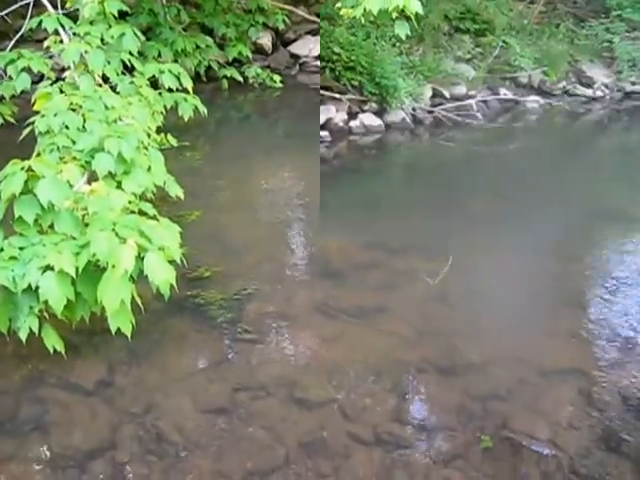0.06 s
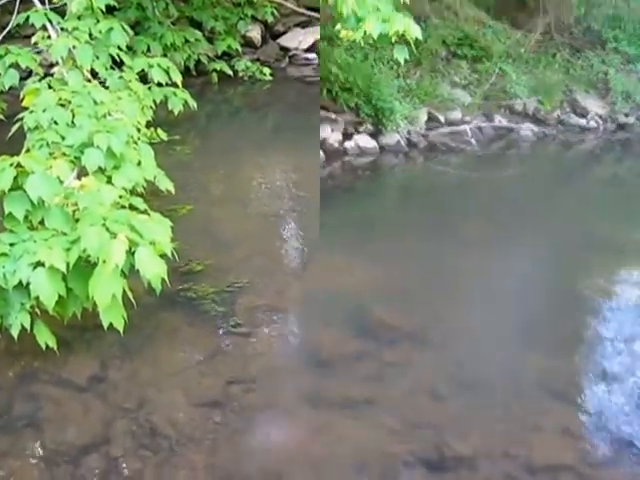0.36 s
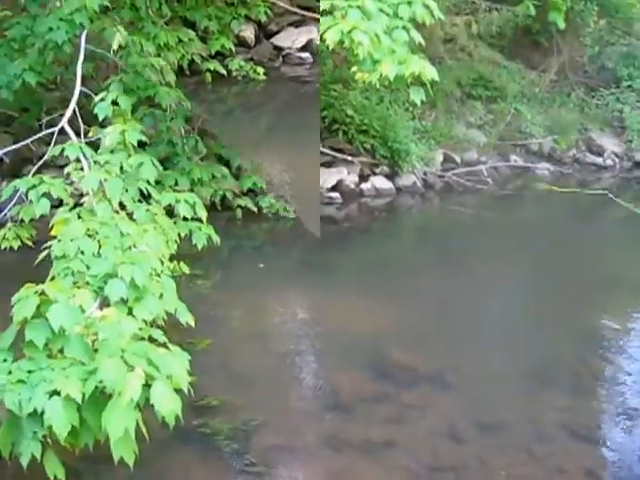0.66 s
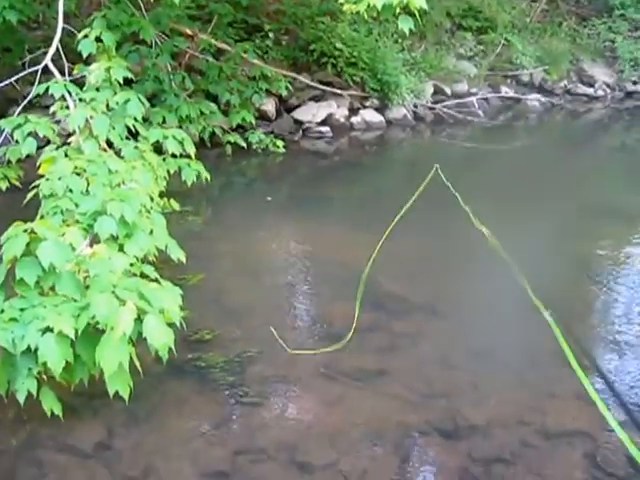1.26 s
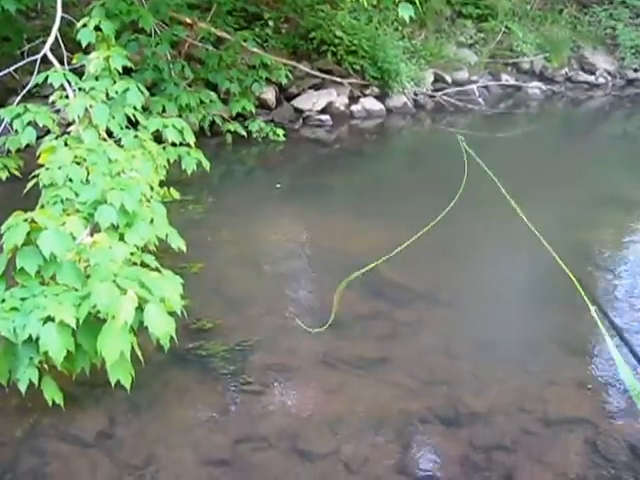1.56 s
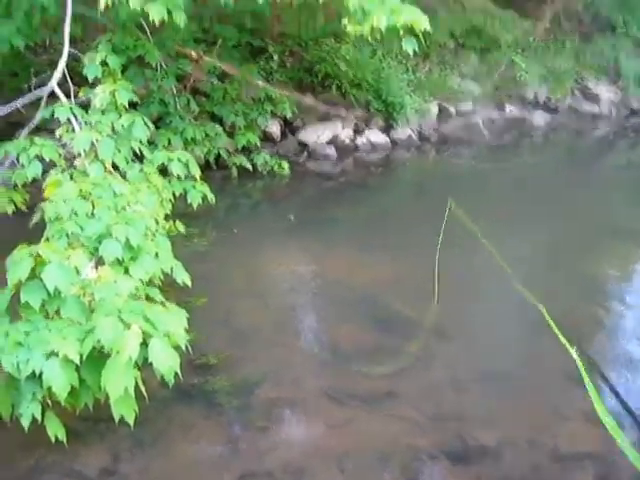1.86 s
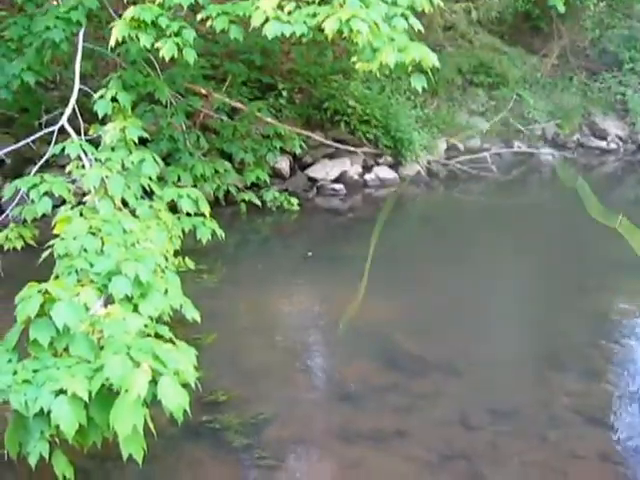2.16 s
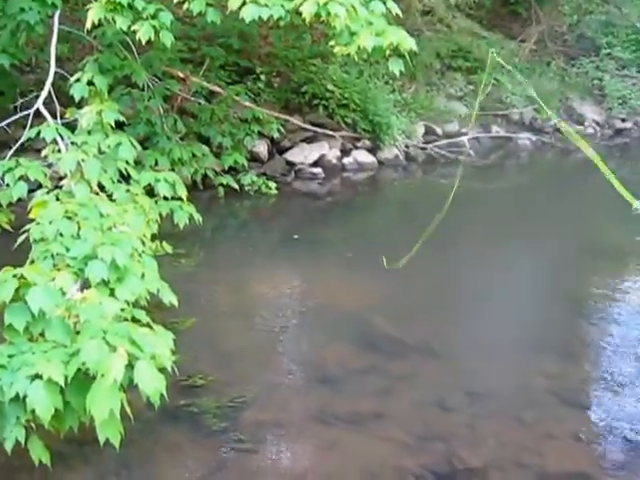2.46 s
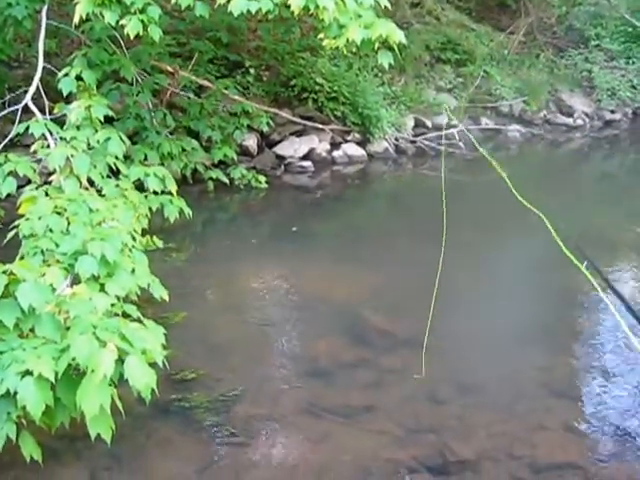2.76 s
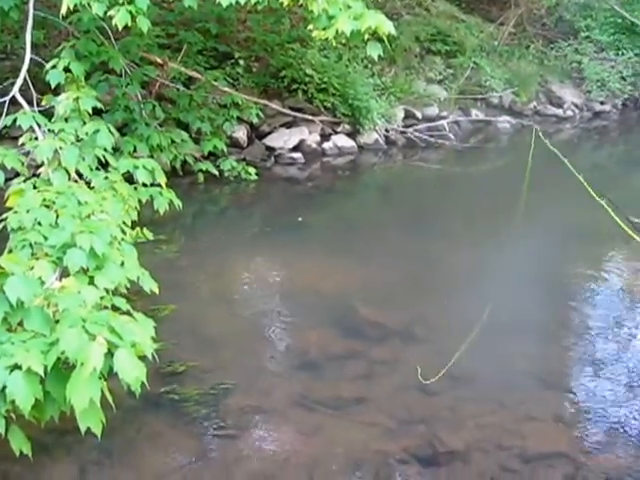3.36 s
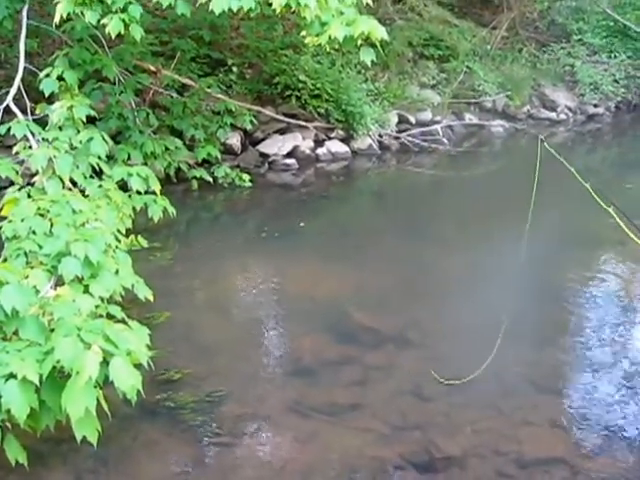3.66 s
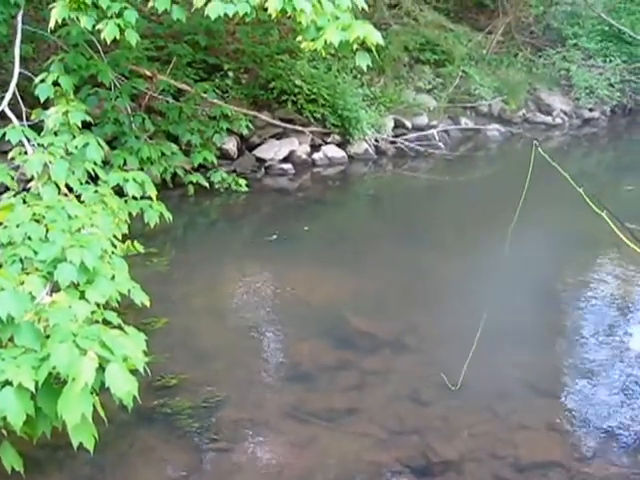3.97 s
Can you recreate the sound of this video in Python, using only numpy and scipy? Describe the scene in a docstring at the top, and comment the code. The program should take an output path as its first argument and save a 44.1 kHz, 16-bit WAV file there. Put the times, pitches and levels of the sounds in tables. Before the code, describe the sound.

A small creek rushes steadily in woodland, bubbling softly. Birds call from the trees with a row of falling notes, thin whistles and three sharp chips. In the second half, fishing tackle ticks lightly close to the microphone.

```python
"""A small creek in woodland, fading in. The water rushes as shaped noise and bubbles ring softly in it.
Birds whistle far off, one sings a row of falling slurs and another gives three sharp chips; each call
is a gliding near-sine, scattered by trunks and leaves. Close by, fishing tackle scrapes softly
and ticks, each tick a snap of noise and a short ring."""
import sys
import numpy as np
from scipy import signal
from scipy.fft import rfft, irfft
from scipy.io import wavfile
from scipy.ndimage import uniform_filter1d

SR = 44100
rng = np.random.default_rng(int(sys.argv[2]) if len(sys.argv) > 2 else 0)


def store_pcm(level_fs):
    """Save levels as 16-bit WAV."""
    pcm = np.round(np.clip(level_fs, -1, 1) * 32767).astype(np.int16)
    wavfile.write(sys.argv[1], SR, np.atleast_2d(pcm).T)


N = 176400


def undb(db):
    """Decibels to gain."""
    return 10 ** (np.asarray(db) / 20)


def unit(x):
    """Scale to rms 1."""
    return x / np.sqrt(np.mean(x ** 2))


def seconds(length_s):
    """Time axis of a short sound."""
    return np.arange(int(length_s * SR)) / SR


def decay(t, t60_s):
    """Envelope that falls 60 dB in t60_s."""
    return np.exp(-np.log(1000) * t / t60_s)


def add(out, start_s, sound):
    """Mix a sound in at a time."""
    i = int(np.clip(start_s * SR, 0, N - 1))
    out[i:i + len(sound)] += sound[:N - i]


def wander(rate_hz):
    """Smooth random drift at rms 1."""
    hold = int(SR / rate_hz)
    steps = np.repeat(rng.standard_normal(N // hold + 1), hold)
    return unit(uniform_filter1d(uniform_filter1d(steps, hold), hold)[:N])


def band_pass(x, low_hz, high_hz):
    """One band of a sound, at rms 1."""
    return unit(signal.sosfilt(signal.butter(2, [low_hz, high_hz], "band", fs=SR, output="sos"), x))


def wood_echo(x, t60_s, tail_t60_s=1.08, tail_db=-5, damp_hz=6040, build_s=.0091, grain=.5):
    """Echoes from trunks and leaves build up and fade: a bright grainy part and a duller tail."""
    t = seconds(1.7)
    scatter, clumps, wash = rng.standard_normal((3, N))[:, :len(t)]
    bright = unit(scatter * np.exp(grain * clumps)) * decay(t, t60_s)
    dull = signal.sosfilt(signal.butter(2, damp_hz, fs=SR, output="sos"), wash)
    tail = undb(tail_db) * dull * decay(t, tail_t60_s)
    echo = (bright + tail) * (1 - np.exp(-t / build_s))
    return signal.fftconvolve(x, echo / np.linalg.norm(echo))[:N]


def leaf_blur(x, decay_s, blur_db):
    """Nearby leaves smear a note over a few milliseconds."""
    t = seconds(.04)
    blur = rng.standard_normal(len(t)) * np.exp(-t / decay_s)
    paths = undb(blur_db) * blur / np.linalg.norm(blur)
    paths[0] += 1  # direct sound
    return signal.fftconvolve(x, paths / np.linalg.norm(paths))


# Spectrum of the rush. Each row: frequency in Hz, relative spectral density in dB.
RUSH_SPECTRUM = [(25, -8.5), (60, -2), (120, -1.5), (280, -4), (480, -2.13), (750, 2.14), (1280, 1),
                 (1650, -4), (2300, -5.5), (3200, -9), (4400, -12.5), (6000, -17.5), (9000, -21.5),
                 (12000, -22), (16000, -27)]


def creek(level_db=-46.5, flicker_db=.37, swell_db=-.03):
    """The rush of a riffle: shaped noise whose half-octave bands flicker a little."""
    bin_hz = np.maximum(np.arange(N // 2 + 1) * SR / N, 1)
    hz, db = np.array(RUSH_SPECTRUM).T
    spectrum = rfft(rng.standard_normal(N)) * undb(np.interp(np.log(bin_hz), np.log(hz), db))
    band = np.round(2 * np.log2(np.maximum(bin_hz, 100)))
    rush = sum(irfft(spectrum * (band == k), N) * undb(flicker_db * wander(18)) for k in np.unique(band))
    return unit(rush) * undb(level_db + swell_db * wander(2.01))


def bubble(hz, decay_cycles=8.9, rise=.119):
    """A bubble rings for some cycles while its pitch rises."""
    cycles = seconds(4 * decay_cycles / hz) * hz
    age = cycles / decay_cycles
    envelope = np.exp(-age) * (1 - np.exp(-cycles))
    return envelope * np.sin(2 * np.pi * cycles * (1 + rise * age / 2))


# Single plops. Each row: start in seconds, starting pitch in Hz, level in dB.
PLOPS = [(.762, 800, -38), (2.441, 1055, -43.5), (3.50, 1100, -39.5)]


def bubbles(per_s=120, fizz_db=-60.5, fizz_hz=1100, spread_octaves=.7):
    """Many tiny bubbles, the higher ones weaker, and a few clearer plops."""
    fizz, plops = np.zeros((2, N))
    for when, height, strength in rng.random((int(per_s * N / SR), 3)):
        hz = fizz_hz * 2 ** (spread_octaves * (3 * height ** 2 - 1))
        add(fizz, when * N / SR, bubble(hz) * strength ** 3 * undb(-7 * height))
    for start_s, hz, db in PLOPS:
        add(plops, start_s, undb(db) * bubble(hz))
    return unit(fizz) * undb(fizz_db) + plops


# Far whistles. Each row: start and length in seconds, first and last pitch in Hz, level in dB.
WHISTLES = [(0.29, .09, 3890, 4800, -60), (0.396, 0.044, 2498, 2733, -45), (0.441, 0.042, 2700, 2694, -52),
            (0.524, 0.029, 2870, 2980, -59), (0.568, 0.069, 2070, 2030, -51),
            (.66, 0.061, 2070, 2100, -51.5), (0.801, 0.1, 2170, 2230, -54), (0.872, 0.29, 2211, 2340, -47),
            (1.04, 0.089, 2180, 2170, -52), (1.051, 0.052, 4500, 4280, -56), (1.29, 0.13, 2160, 2140, -54),
            (1.371, .05, 3800, 3740, -50), (1.416, .1, 2330, 2330, -56), (1.498, 0.092, 3500, 3385, -57),
            (1.52, 0.096, 2150, 2146, -56), (1.74, 0.12, 2150, 2135, -58.5), (1.96, .08, 2130, 2120, -58)]


def far_birds(bend=2.6, waver=.0064, edge_share=.14, echo_db=-1.5):
    """Thin whistles that glide, waver slightly, level off and linger among the trees."""
    out = np.zeros(N)
    for start_s, length_s, first_hz, last_hz, db in WHISTLES:
        t = seconds(length_s)
        glide_hz = last_hz + (first_hz - last_hz) * (1 - t / length_s) ** bend
        hz = glide_hz * (1 + waver * wander(250)[:len(t)])
        envelope = np.minimum(np.minimum(t, length_s - t) / (edge_share * length_s), 1)
        add(out, start_s, undb(db) * envelope * np.sin(2 * np.pi * np.cumsum(hz) / SR))
    return out + undb(echo_db) * wood_echo(out, t60_s=1.05)


# Modes of the tackle. Each row: frequency in Hz, relative level in dB, T60 in seconds.
TACKLE_MODES = [(2550, -8, .02), (4040, -6, .012), (4510, 1.5, 0.019), (5103, -2, 0.014), (5500, -5, 0.011),
                (6700, -17, .01)]
# Ticks. Each row: start in seconds, ring level in dB, snap level against the ring in dB.
TICKS = [(.875, -49, 3), (1.134, -42, -12), (1.294, -44, -9), (2.347, -41, 1), (2.358, -46, 0),
         (2.409, -30, -18), (2.411, -30, -18), (2.4975, -26, -16), (2.5005, -26, -14), (2.519, -39, -14),
         (2.783, -35, -18), (2.901, -40, -12), (2.989, -39, -14)]
# Scrapes. Each row: start in seconds, decay time in seconds, level in dB.
SCRAPES = [(2.211, .025, -46), (2.369, .02, -42)]


def tackle(snap_s=.001, snap_band_hz=(3700, 16000), scrape_hz=2400, scrape_octaves=.41):
    """Light close ticks, each a bright snap and a short ring, and two soft grainy scrapes."""
    out, t = np.zeros(N), seconds(.12)
    ring = sum(undb(db) * np.sin(2 * np.pi * hz * t) * decay(t, t60_s) for hz, db, t60_s in TACKLE_MODES)
    ring /= np.abs(ring).max()
    for start_s, db, snap_db in TICKS:
        snap = band_pass(rng.standard_normal(len(t)), *snap_band_hz) * np.exp(-t / snap_s)
        add(out, start_s, undb(db) * (ring + undb(snap_db) * snap))
    for start_s, decay_s, db in SCRAPES:
        spikes = rng.standard_normal(len(t)) ** 3
        grit = band_pass(spikes, scrape_hz / 2 ** scrape_octaves, scrape_hz * 2 ** scrape_octaves)
        add(out, start_s, undb(db) * grit * np.exp(-t / decay_s))
    return out


def falling_note(shape, tilt_db_per_octave, jitter, overtone_db):
    """A near-sine with a slightly unsteady pitch and a weak second harmonic."""
    times_s, hz, db = np.array(shape).T
    t = times_s[0] + seconds(times_s[-1] - times_s[0])
    pitch_hz = np.interp(t, times_s, hz)
    phase = 2 * np.pi * np.cumsum(pitch_hz * (1 + jitter * wander(1500)[:len(t)])) / SR
    tilt_db = tilt_db_per_octave * np.log2(pitch_hz / hz[np.argmax(db)])
    envelope = undb(np.interp(t, times_s, db) + tilt_db) * signal.windows.tukey(len(t), .1)
    overtone = undb(overtone_db + 18 * np.log2(pitch_hz / 7000))  # grows 18 dB per octave of pitch
    return envelope * (np.sin(phase) + overtone * np.sin(2 * phase))


# One chip. Each row: time from the loudest point in seconds, pitch in Hz, relative level in dB.
CHIP_SHAPE = [(-.034, 10090, -19), (-.027, 9400, -13), (-.018, 8500, -13), (-.012, 7130, -11.5),
              (-.006, 5864, -5.5), (-.001, 4900, 1), (.003, 4170, -2.5), (.008, 3260, -6.5)]
# Chips. Each row: time of the loudest point in seconds, level in dB, tilt in dB per octave.
CHIPS = [(.619, -36, 2), (1.445, -35.5, -1), (2.566, -35.5, 3)]


def chipping_bird(echo_db=7.5, scatter_hz=4300):
    """Very fast downward sweeps, each with a wash of echoes; leaves scatter the high part most."""
    out = np.zeros(N)
    leaves = signal.butter(3, scatter_hz, "high", fs=SR, output="sos")
    for peak_s, db, tilt_db_per_octave in CHIPS:
        start_s = peak_s + CHIP_SHAPE[0][0]
        note = undb(db) * falling_note(CHIP_SHAPE, tilt_db_per_octave, jitter=.02, overtone_db=-14)
        add(out, start_s, leaf_blur(note, decay_s=.004, blur_db=0))
        add(out, start_s, undb(echo_db) * wood_echo(signal.sosfilt(leaves, note), t60_s=.48))
    return out


# One slur. Each row: time from the loudest point in seconds, pitch in Hz, relative level in dB.
SLUR_SHAPE = [(-.042, 5500, -30), (-.029, 5250, -23), (-.015, 4850, -16), (-.006, 4600, 0), (.002, 4300, 0),
              (.010, 3870, -8), (.016, 3300, -16), (.025, 2850, -23)]
# Slurs. Each row: time of the loudest point in seconds, level in dB.
SLURS = [(.458, -41), (.703, -38), (.939, -36), (1.174, -36.5), (1.408, -37), (1.645, -37), (1.876, -37.5),
         (2.109, -40.5), (2.346, -42)]


def slurring_bird(echo_db=-4.5):
    """A row of down-slurred notes, about four a second, that swells and fades among the trees."""
    out = np.zeros(N)
    for peak_s, db in SLURS:
        start_s = peak_s + SLUR_SHAPE[0][0]
        note = falling_note(SLUR_SHAPE, tilt_db_per_octave=-1, jitter=.018, overtone_db=-32)
        blurred = undb(db) * leaf_blur(note, decay_s=.0088, blur_db=1)
        add(out, start_s, blurred)
        add(out, start_s, undb(echo_db) * wood_echo(blurred, t60_s=1.5))
    return out


def scene():
    """Water, birds and tackle in mono."""
    return (creek() + slurring_bird() + chipping_bird() + far_birds() + tackle() + bubbles())[None]


# Fade-in. Each row: time in seconds, gain in dB. The last gain holds.
FADE_IN = [(0, -18.5), (.1, -13), (.25, -9.5), (.4, -7), (.55, -4.5), (.75, -1.5)]


def record(dry, notch_hz=7895, notch_width_hz=780, top_hz=15750):
    """The sound fades in; the recorder has a narrow notch in the treble and cuts the top."""
    faded = dry * undb(np.interp(np.arange(N) / SR, *np.array(FADE_IN).T))
    notch = signal.iirnotch(notch_hz, notch_hz / notch_width_hz, fs=SR)
    notched = signal.lfilter(*notch, signal.lfilter(*notch, faded))
    return signal.sosfilt(signal.ellip(10, .2, 70, top_hz, fs=SR, output="sos"), notched)


dry = scene()
out = record(dry)
store_pcm(out)
```